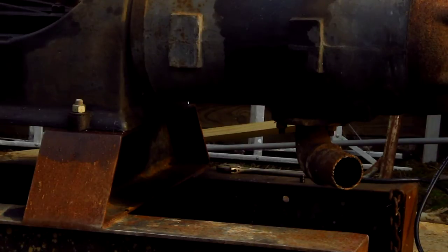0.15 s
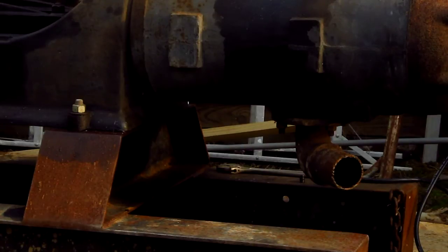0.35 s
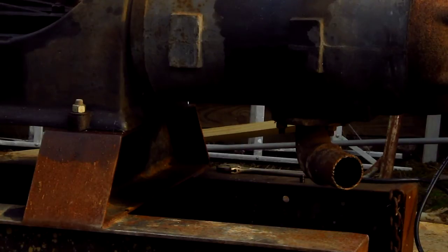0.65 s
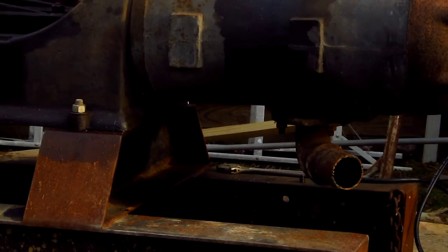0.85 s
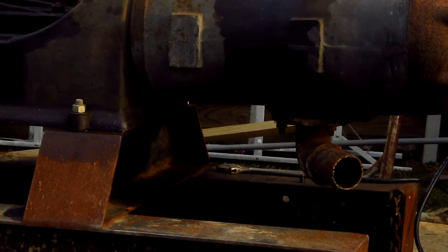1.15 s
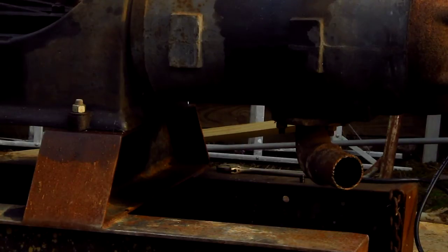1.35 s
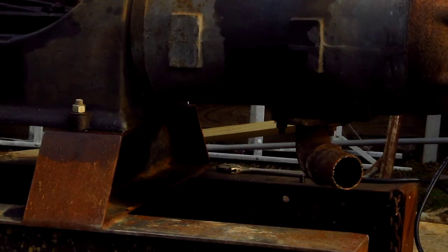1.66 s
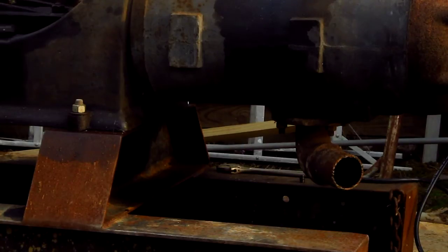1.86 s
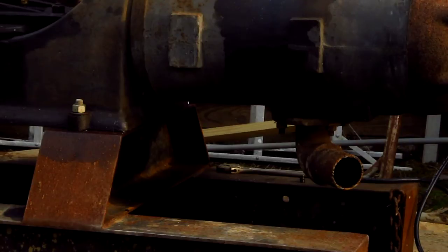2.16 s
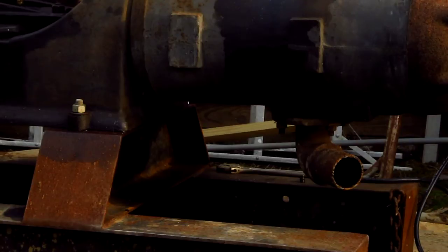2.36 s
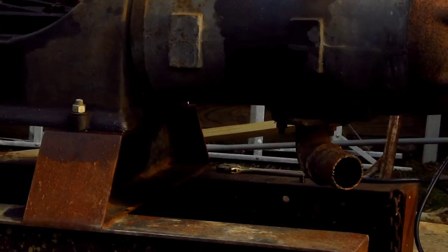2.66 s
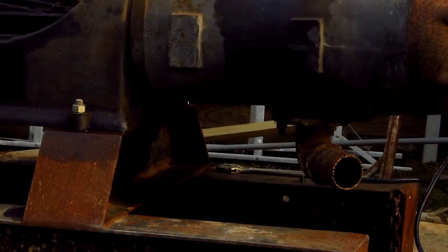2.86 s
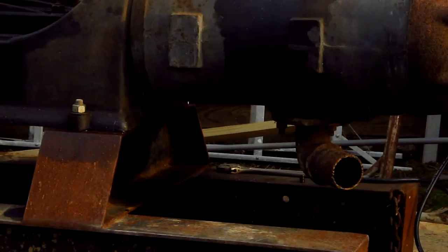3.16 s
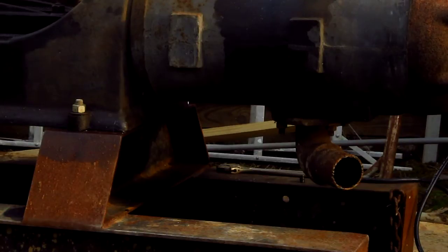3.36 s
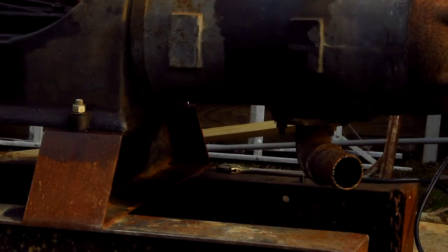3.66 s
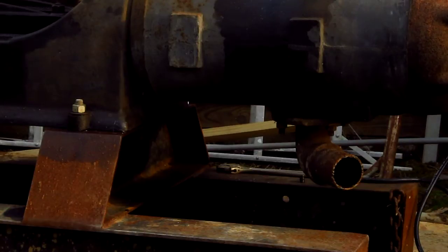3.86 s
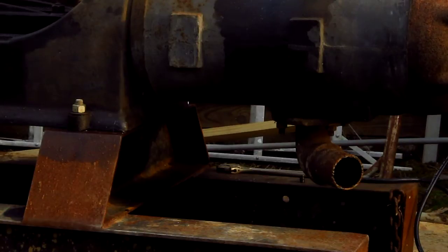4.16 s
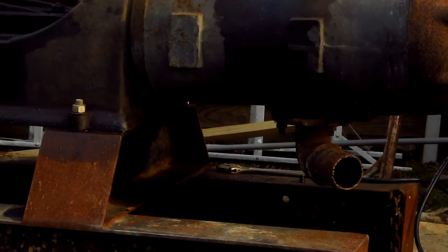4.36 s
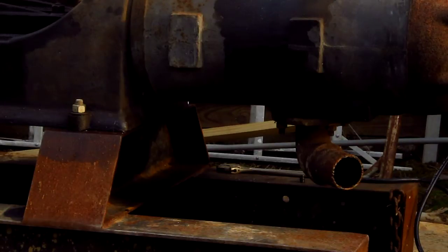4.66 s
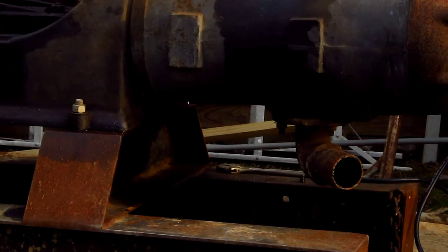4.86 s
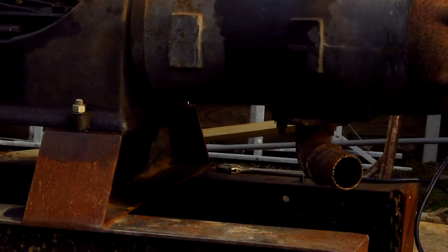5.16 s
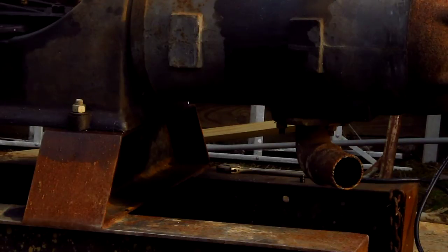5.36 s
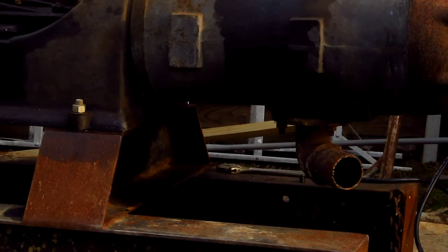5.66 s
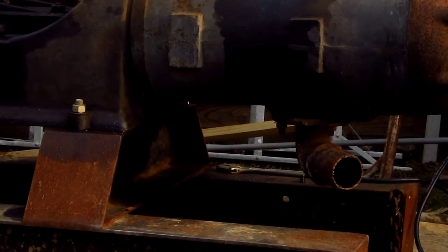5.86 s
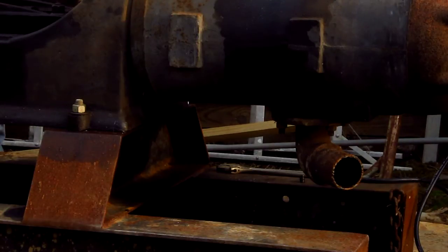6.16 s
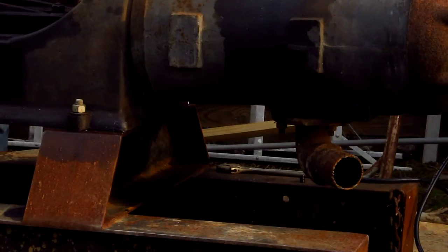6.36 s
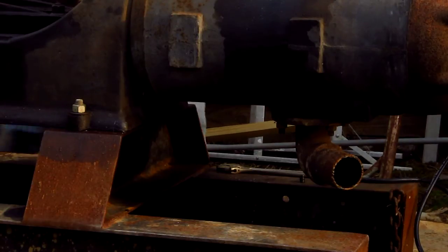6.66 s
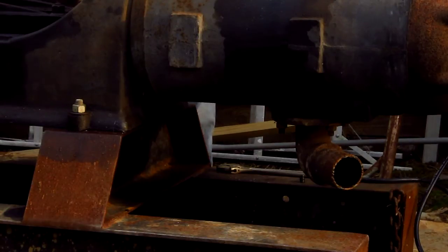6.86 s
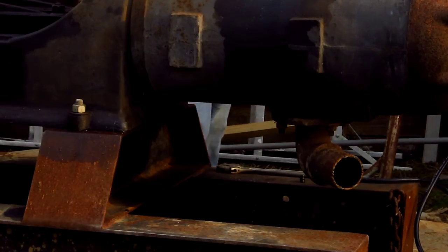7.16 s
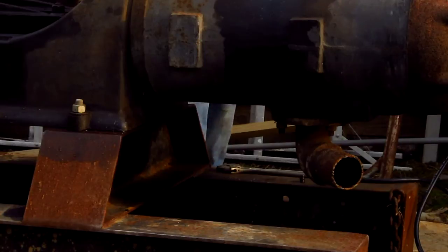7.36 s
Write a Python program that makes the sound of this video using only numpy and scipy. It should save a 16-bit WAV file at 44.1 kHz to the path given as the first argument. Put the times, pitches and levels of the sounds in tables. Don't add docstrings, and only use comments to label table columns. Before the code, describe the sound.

Close stereo pickup of a slow steam engine in a quiet open yard, with a faint, wavering low motor hum and rumble throughout. A loud bright steam jet is already blowing and fades by 0.45 s, leaving the hum. At 1.2 s a rod knocks dully; a softer singing, gurgling hiss swells on the right, strongest around 1.65, then sinks. At 2.0-2.2 a juddering, hollow chuff thuds and spits wetly, with a tiny high whistle. A low airy pipe song and spits lead into a long jet, full from 2.7, getting brighter and drier, cut at 3.9 by a quick clatter of ringing loose iron. Quiet hum. At 4.4 another knock and right-hand leak; at 5.25 a softer chuff. Faint metal taps and spits around 5.5-5.85 open the last strong jet, full from 6.0 to the end at 7.5. A soft double-bump footstep on boards lands at 6.56.

```python
import sys
import numpy as np
from scipy import signal
from scipy.fft import rfft, irfft, next_fast_len
from scipy.io import wavfile
from scipy.ndimage import uniform_filter1d

SR = 44100
rng = np.random.default_rng(int(sys.argv[2]) if len(sys.argv) > 2 else 0)


def gain_from_decibels(decibels):
    exponent = np.asarray(decibels, float) / 20
    return 10 ** exponent


def inscribe(sig):
    pcm = np.round(np.clip(np.atleast_2d(sig).T, -1, 1) * 32767)
    wavfile.write(sys.argv[1], SR, pcm.astype(np.int16))


N = 331632
SIZE = next_fast_len(N + SR // 8)
HZ = np.maximum(np.arange(SIZE // 2 + 1) * SR / SIZE, 1)

# (frequency [Hz], level [dB per Hz])
EXHAUST_TONE = [(180, -58), (300, -39), (674, -21.5), (863, -24.5), (1940, -13.5), (2930, -9.5),
                (3180, -11.5), (5300, -8.5), (7750, -13.5), (8840, -13), (12700, -16.5), (15500, -24.5)]


def rms_one(x):
    return x / np.sqrt(np.mean(x ** 2) + 1e-20)


def in_time(*tables):
    rows = []
    for table in tables:
        first, last = table[0], table[-1]
        rows += [(first[0] - .02, -100, *first[2:]), *table, (last[0] + .02, -100, *last[2:])]
    s, *columns = np.transpose(rows)
    return [np.interp(np.arange(N) / SR, s, column) for column in columns]


def at_hz(points):
    hz, value = np.transpose(points)
    return np.interp(np.log(HZ), np.log(np.maximum(hz, 1)), value)


def through(x, response):
    return irfft(rfft(x, SIZE) * response, SIZE)[..., :N]


def drift(rate):
    r = np.exp(-64 * np.pi * rate / SR)
    slow = signal.lfilter([1], [1, -2 * r, r * r], rng.standard_normal(N // 32 + 1002))[1000:]
    return np.interp(np.arange(N) / 32, np.arange(len(slow)), rms_one(slow))


def humps(rings):
    power = 0
    for hz, width, level_db in rings:
        power = power + gain_from_decibels(2 * level_db) / (1 + (2 * (HZ - hz) / width) ** 2 / 2.3) ** 2
    return power


def dips(notches):
    gain = np.ones_like(HZ)
    for hz, width, depth_db in notches:
        gain *= 1 - (1 - gain_from_decibels(min(depth_db, 0))) / (1 + ((HZ - hz) / width) ** 2)
    return gain


def ports(lean_db, lag_s):
    left = gain_from_decibels(lean_db * np.tanh(HZ / 1500)) * np.exp(-2j * np.pi * HZ * lag_s)
    return np.array([left, np.ones_like(HZ)])


def swells(rows, fall_s):
    t, levels = np.arange(N) / SR, []
    for start, end, db, rise_s in rows:
        outside = np.maximum((start - t) / rise_s, (t - end) / fall_s)
        levels.append(db - 20 * np.maximum(0, outside))
    return np.max(levels, axis=0)


def ironwork(colour, rings, between_db):
    power = gain_from_decibels(2 * (at_hz(colour) + between_db)) + humps(rings)
    cepstrum = irfft(np.log(power) / 2, SIZE)
    cepstrum[1:SIZE // 2] *= 2
    cepstrum[SIZE // 2 + 1:] = 0
    return np.exp(rfft(cepstrum))


def exhaust_pipe():
    # (frequency [Hz], width [Hz], level [dB])
    iron_rings = [(2510, 60, -13), (2960, 170, -9), (3490, 52, -7), (3690, 59, -6), (3870, 31, -9),
                  (4040, 57, -6), (4620, 68, -4), (4950, 37, -1), (5460, 220, 0), (5790, 110, -4),
                  (6030, 56, -3), (6360, 25, -6), (6740, 150, -3), (7060, 53, -3), (7390, 36, -9),
                  (7710, 34, -11), (8180, 110, -8), (8550, 120, -6), (8820, 130, -7), (9210, 69, -7),
                  (9880, 120, -8), (10300, 98, -10), (10700, 100, -12), (11600, 64, -11), (12000, 130, -14),
                  (12300, 120, -12), (12700, 130, -12), (13400, 140, -15),
                  (710, 78, -25.5), (1544, 110, -14), (5084, 320, -7)]
    # (frequency [Hz], width [Hz], depth [dB])
    echo_dips = [(4730, 59, -14), (5577, 77, -13), (6815, 34, -5.5)]
    return ironwork(EXHAUST_TONE, iron_rings, between_db=-1.5) * dips(echo_dips)


def follow(flows, slugs, laws, early):
    knee_soft_db, drain_shape = 2.5, 2.14
    gather_s = 0.22
    strokes = []
    for flow, slug in zip(flows, slugs):
        strongest_db, end_s = max(np.transpose(flow)[1]), flow[-1][0]
        strokes.append([(s, db, strongest_db, end_s, *slug) for s, db in flow])
    hiss_db, full_db, end, start, amount, stays, returns = in_time(*strokes)
    t = np.arange(N) / SR
    closing = returns * np.exp(-(np.maximum(end - t, 0) / gather_s) ** 2)
    age = t - start
    age = np.maximum(age, -early * age)
    levels = [hiss_db]
    for level_db, knee_db, slope, wet_db, drain_s in laws:
        below = (knee_db + full_db - hiss_db) / knee_soft_db
        drop_db = slope * knee_soft_db * np.logaddexp(0, below)
        wetness = closing + stays + (amount - stays) * np.exp(-(age / drain_s) ** drain_shape)
        levels.append(full_db + level_db - drop_db + wet_db * wetness)
    return levels


def jet(levels, path, smooth, ears, diffuse_db, gusty_db, echoes_db):
    splits_hz, echoes_t60_s = (1200, 3500, 8000), .022
    hiss_db, roar_db, body_db, top_db = levels
    gusts = gain_from_decibels(gusty_db * (drift(3.14) + drift(48) + 0.28 * drift(200)))
    rising = np.tanh(0.15 + HZ / 7000)
    echoes = rng.standard_normal(800) * gain_from_decibels(-60 * np.arange(800) / SR / echoes_t60_s)
    echoes[:SR // 1000] = 0
    echoes = echoes / np.sqrt(np.sum(echoes ** 2))
    echoes = rfft(echoes, SIZE) * [[1], [-1]]
    direct = rfft(gusts * rng.standard_normal(N), SIZE) * path * ears
    diffuse = rfft(gusts * rng.standard_normal((2, N)), SIZE) * gain_from_decibels(diffuse_db) * rising * smooth
    steam = direct * (1 + gain_from_decibels(echoes_db) * rising * echoes) + diffuse
    steps = [1 / (1 + (hz / HZ) ** 6) for hz in splits_hz]
    shares = [1 - steps[0], steps[0] - steps[1], steps[1] - steps[2], steps[2]]
    out = np.zeros((2, N))
    for db, share in zip([roar_db, body_db, hiss_db, top_db], shares):
        band = rms_one(irfft(steam * share, SIZE)[:, :N])
        out += gain_from_decibels(db + .5 * drift(35)) * band
    return out


def song(level_db, tones, ears, boost_db):
    air = through(rng.standard_normal(N), np.sqrt(humps(tones)) * ears)
    return gain_from_decibels(level_db + boost_db) * rms_one(air)


def strikes(events, modes, spread_db, soft_s):
    at, out = [round(e[0] * SR) for e in events], np.zeros(N)
    luck = spread_db * rng.standard_normal((len(at), len(modes)))
    sides = rng.choice([-1, 1], luck.shape)
    swell = np.exp(-1 / (soft_s * SR))
    for k, (hz, level_db, t60) in enumerate(modes):
        clicks = np.full(N, 1e-18)
        clicks[at] = gain_from_decibels(np.array(events)[:, 1] + level_db + luck[:, k]) * sides[:, k]
        r, w = gain_from_decibels(-60 / (t60 * SR)), 2 * np.pi * hz / SR
        ringing = [1, -2 * r * np.cos(w), r * r]
        rounding = [1, -2 * swell * np.cos(w), swell ** 2]
        gain = 2 * (1 - swell) * np.sin(w) ** 2
        out += signal.lfilter([0, gain], np.convolve(ringing, rounding), clicks)
    return signal.sosfilt(signal.butter(2, 0.63 * modes[0][0], "high", fs=SR, output="sos"), out)


def yard():
    # (frequency [Hz], level [dB per Hz])
    yard_tone = [(71, -38), (120, -15), (234, -18.5), (323, -21.5), (420, -50), (446, -12.5), (474, -19),
                 (524, -16.5), (5140, -21.5), (5570, -19.5), (7860, -31.5), (13300, -29.5), (13800, -39),
                 (15500, -42)]
    # (frequency [Hz], likeness [0 to 1])
    likeness = [(60, 0.92), (240, 1), (950, 0.25), (3770, 0.05), (15000, 0.03)]
    alike = np.clip(at_hz(likeness), -1, 1)
    mid, side = rfft(rng.standard_normal((2, N)), SIZE) * [np.sqrt(1 + alike), np.sqrt(1 - alike)]
    floor = irfft(gain_from_decibels(at_hz(yard_tone)) * (mid + side * [[1], [-1]]), SIZE)[:, :N]
    return gain_from_decibels(-55.5) * rms_one(floor)


def motor():
    # (time [s], frequency [Hz], level [dB])
    hum = [(0.12, 102, -71), (0.45, 96.3, -61), (0.71, 101.7, -60), (1.32, 101.7, -60), (1.55, 100.5, -57),
           (2.11, 101.7, -54), (2.3, 98.9, -56), (2.72, 97.6, -54.5), (2.95, 96.3, -69), (3.65, 96.4, -74),
           (3.9, 93.1, -68), (4.28, 94.0, -57), (4.55, 95.2, -59), (4.82, 101.6, -60), (5.57, 101.6, -55),
           (6.0, 101.6, -54), (6.45, 101.5, -63), (7.52, 102, -66)]
    # (frequency [Hz], level [dB per Hz])
    rumble_tone = [(12, -45), (20, -4), (97, -4.5), (156, -11), (189, -10.5), (242, -14), (400, -10.5),
                   (520, -42), (880, -120)]
    # (start [s], end [s], level [dB], rise [s per 20 dB])
    shudders = [
        (1.36, 1.44, -50, .3),
        (2.06, 2.16, -45, .2),
        (4.42, 4.52, -55, .2),
        (5.26, 5.34, -48, .2),
        (5.85, 5.98, -50, .3),
        (6.75, 7.52, -57, .6),
    ]
    # (time [s], change [dB])
    stumbles = [
        (1.43, -13.5),
        (4.42, -18),
        (5.26, -7),
        (7.2, -8),
    ]
    s, *columns = np.transpose(hum)
    t = np.arange(N) / SR
    hz, line_db = [np.interp(t, s, column) for column in columns]
    rumble_db = -57 + .8 * (line_db + 60)
    rumble_db = np.maximum(rumble_db, swells(shudders, fall_s=.25))
    for at, db in stumbles:
        line_db = line_db + db * np.exp(-((t - at) / 0.054) ** 2)
    turn = np.pi * np.cumsum(hz + 1.41 * drift(6.7)) / SR
    orders = gain_from_decibels(1.5 + 2.1 * drift(12)) * np.sin(2 * turn)
    orders += gain_from_decibels(-11 + 3 * drift(5)) * np.sin(turn)
    near, own = rng.standard_normal(N), rng.standard_normal((2, N))
    rumble = near + 0.9 * own * np.array([[.6], [1.2]])
    rumble = rms_one(through(rumble, gain_from_decibels(at_hz(rumble_tone))))
    return gain_from_decibels(line_db) * orders + gain_from_decibels(rumble_db - 2.0) * rumble


def footfall():
    # (time [s], peak [dB])
    bumps = [
        (6.558, -36.5),
        (6.575, -38.5),
        (6.585, -43),
        (6.612, -45.5),
    ]
    # (frequency [Hz], level [dB], time to fall 60 dB [s])
    boards = [(131, -1, 0.066), (197, 3, 0.068), (287, -3, 0.03)]
    return strikes(bumps, boards, 2.7, 0.00185)


def valve_gear():
    # (time [s], peak [dB])
    thuds = [
        (2.03, -45.5),
        (2.07, -45.5),
        (5.235, -47),
        (5.28, -45.5),
    ]
    knocks = [
        (1.185, -40.5),
        (4.39, -42),
    ]
    clanks = [(3.8447, -40), (3.8651, -36), (3.8805, -36), (3.8879, -33), (3.8984, -31), (3.9074, -32),
              (3.9121, -34), (3.9195, -37), (3.9374, -37), (3.9599, -40), (3.985, -44)]
    cover_blows = [
        (3.884, -42),
        (3.905, -46),
        (5.3, -47),
    ]
    bracket_blows = [
        (3.929, -43),
        (5.47, -60),
        (5.628, -50),
    ]
    # (frequency [Hz], level [dB], time to fall 60 dB [s])
    frame = [(71.6, 2, 0.56), (135, 2, 0.35), (224, 0.5, 0.42), (296.7, -2.5, 0.78), (358.6, 4, 0.37),
             (653, 2, 0.13)]
    rod = [(194, -2.5, 1), (624, -7, 0.43)]
    plate = [(1357, -22, .5), (1464, -24, .6), (1560, -14, .12), (1717, -20, .3), (1793, -19, .35),
             (1850, -17, .2), (1938, -15, .4), (2083, -8, .27), (2140, -16, .2), (2310, -18, .25),
             (2433, -5, .25), (2500, -10, .2), (2590, -6, .22), (2640, -7, .2), (2681, -9, .3),
             (2760, -13, .25), (2837, -12, .25), (3025, -19, .3), (3165, -24, .28)]
    cover = [(371, -12, 0.27), (580, -14, .2), (690, -5, 0.186), (760, -12, .2), (1000, -6, .25),
             (1130, -18, .4)]
    bracket = [(511, 0, .55), (1066, 2.5, .36)]
    iron = strikes(thuds, frame, 1.1, 0.0023) + strikes(knocks, rod, 1.1, 0.0033)
    iron += strikes(clanks, plate, 4.2, 0.0024)
    return iron + strikes(cover_blows, cover, 1.5, .004) + strikes(bracket_blows, bracket, .6, .004)


def whistles():
    # (start [s], end [s], frequency [Hz], level [dB])
    whistle_rows = [
        (2.08, 2.156, 9234, -41),
        (5.267, 5.325, 9200, -42),
    ]
    t, out = np.arange(N) / SR, np.zeros(N)
    for start, end, hz, level_db in whistle_rows:
        gate = np.clip(np.minimum(t - start, end - t) / 0.0054, 0, 1)
        tone = np.sin(2 * np.pi * np.cumsum(hz + 40 * drift(50)) / SR)
        out += gate * gain_from_decibels(level_db + 2.5 + 2.5 * drift(60)) * tone
    return out


def spits():
    # (time [s], peak [dB], time to fall 60 dB [s])
    spit_rows = [(1.963, -12, 0.05), (2.0, -14, 0.04), (2.034, -14, 0.09), (2.1036, -16.5, 0.07),
                 (2.158, -7.5, 0.024), (2.1928, -12, 0.039), (2.4714, -27, 0.05), (2.4932, -16, 0.041),
                 (2.5239, -25, 0.014), (5.1794, -24, 0.08), (5.73, -20, 0.046), (5.8193, -12.5, 0.044),
                 (5.844, -19, 0.029)]
    t, shape = np.arange(N) / SR, np.zeros(N)
    for s, peak_db, t60 in spit_rows:
        age = np.maximum(t - s, 0)
        shape += gain_from_decibels(peak_db - 6.5 - 60 * age / t60) * np.tanh(age / .0016)
    thump = gain_from_decibels(-4.0) / (1 + 2j * (HZ - 630) / 90)
    wet = exhaust_pipe() / (1 + HZ / 9000) + thump
    return through(shape * rng.standard_normal(N), wet / np.sqrt(np.mean(np.abs(wet) ** 2)))


def chuff_shape():
    # (time [s], level [dB], length [s])
    closings = [
        (2.03, -23, 0.085),
        (5.233, -26, 0.07),
    ]
    t = np.arange(N) / SR
    nearest = np.argmin([np.abs(t - c[0]) for c in closings], axis=0)
    s, peak_db, length = np.array(closings)[nearest].T
    age = np.maximum(t - s, 0)
    sag_db = -100 * age - 150 * np.maximum(age - length, 0)
    fall_db = np.maximum(sag_db, -21 - 90 * age)
    return peak_db + fall_db - 900 * np.maximum(s - t, 0)


def chuffs():
    # (time [s], peak [dB], cavity frequency [Hz])
    puff_rows = [(2.0198, -27, 2100), (2.0269, -22, 2450), (2.0375, -21, 1850), (2.0466, -20, 1810),
                 (2.0547, -18, 1750), (2.0683, -21, 1660), (2.0725, -22, 1730), (2.0869, -23, 2060),
                 (2.101, -24, 2200), (2.1051, -27, 2140), (2.1145, -29, 1700), (2.1278, -31, 1890),
                 (2.1321, -32, 2190), (2.147, -37, 1530), (5.2245, -36, 2220), (5.2315, -25, 2510),
                 (5.238, -22, 2270), (5.2446, -25, 1810), (5.2488, -23, 1790), (5.2595, -22, 1710),
                 (5.2636, -27, 1400), (5.2684, -28, 2270), (5.273, -24, 1660), (5.2774, -25, 1790),
                 (5.2915, -28, 1770), (5.3002, -31, 1940), (5.3057, -27, 2090), (5.3193, -28, 2120),
                 (5.3267, -33, 1930), (5.3321, -34, 1670), (5.3366, -35, 1910), (5.3424, -35, 1920),
                 (5.3561, -39, 2050), (5.3608, -39, 1610), (5.3649, -39, 1720), (5.3783, -43, 2430)]
    # (start [s], end [s], level [dB], rise [s per 20 dB])
    booms = [
        (2.035, 2.05, -36, .02),
        (2.075, 2.15, -36.5, .05),
        (5.24, 5.26, -40, .02),
        (5.3, 5.36, -41, .08),
    ]
    s, peak_db, cavity_hz = np.transpose(puff_rows)
    centre_hz = np.interp(np.arange(N) / SR, s, cavity_hz)
    steam, cavity, low = rng.standard_normal(N), np.zeros(N), np.zeros(N)
    for hz in np.geomspace(400, 3600, 11):
        sos = signal.butter(2, [hz / 1.12, hz * 1.12], "band", fs=SR, output="sos")
        band = rms_one(signal.sosfilt(sos, steam))
        cavity += band * np.exp(-(np.log(1.06 * hz / centre_hz) / 0.3) ** 2)
        low += band * np.exp(-(np.log(hz / 620) / 0.3) ** 2)
    cavity /= np.sqrt(uniform_filter1d(cavity ** 2, size=120) + .01)
    puffs, around = np.zeros(N), np.arange(-441, 1323)
    age = around / SR
    shape_db = -3.5 - 20 * np.maximum(-age / .003, age / .007)
    for at, db in zip(s, peak_db):
        puffs[round(at * SR) + around] += gain_from_decibels(db + shape_db)
    bed = gain_from_decibels(chuff_shape() - 11)
    boom = gain_from_decibels(swells(booms, fall_s=.06) + 1.2 * drift(40))
    return (puffs + bed) * cavity + boom * low


def gland_leak():
    # (time [s], level [dB])
    leak_flow = [
        [(1.05, -63.5), (1.156, -42), (1.33, -31.5), (1.64, -24), (1.822, -26), (1.95, -33), (2.08, -37.5),
         (2.22, -39), (2.33, -53)],
        [(4.3, -61), (4.368, -41), (4.512, -32.5), (4.66, -27), (4.924, -27.5), (5.17, -38), (5.34, -40),
         (5.47, -47), (5.6, -58)],
    ]
    # (time [s], amount, amount that stays, amount back at closing)
    leak_water = [
        (2.13, 1.2, .02, -1.1),
        (5.29, 1.1, .02, -.9),
    ]
    # (level [dB re full hiss], knee [dB re full flow], slope [dB per dB], wet gain [dB], drain [s])
    leak_laws = [
        (-15, 1.5, 0.84, 8.8, 0.16),
        (-4.5, -1, 1.11, 6.2, 0.044),
        (0.5, 1.5, 1.43, 1.5, 0.055),
    ]
    # (frequency [Hz], level [dB per Hz])
    leak_tone = [(180, -52.5), (300, -25.5), (581, -2.5), (769, -8), (907, -6.5), (1350, -7), (2100, -3.5),
                 (2520, -6.5), (5480, -4), (12900, -7), (14600, -11), (15300, -28)]
    # (frequency [Hz], width [Hz], level [dB])
    leak_rings = [(663, 280, -7.5), (915, 44, -4), (2141, 52, 3.5), (2946, 157, -4.5), (4450, 79, -5),
                  (5050, 70, -1), (5490, 340, -2.5), (6260, 170, -20), (6920, 390, -1), (7660, 54, -2),
                  (8240, 120, -7), (8780, 120, -19), (9190, 150, 4), (10250, 100, -26.5), (10930, 27, -27),
                  (11550, 130, -28), (11800, 90, -1.5), (12500, 90, -4), (12800, 60, -5), (13100, 67, -19),
                  (13800, 130, -7), (14250, 200, -7)]
    # (frequency [Hz], width [Hz], depth [dB])
    leak_dips = [(4700, 90, -8), (6850, 150, -4), (8550, 90, -5), (9700, 250, -4), (13420, 70, -10),
                 (14020, 50, -8)]
    # (start [s], end [s], level [dB], rise [s per 20 dB])
    gland_singing = [
        (1.13, 1.4, -43, .03),
        (1.66, 2.02, -36, .25),
        (4.35, 4.65, -44, .03),
        (4.95, 5.21, -39, 0.5),
    ]
    gurgle = [
        (1.5, 1.98, -45, .3),
    ]
    # (frequency [Hz], width [Hz], level [dB])
    gland_tones = [(650, 175, -7), (960, 38, -16), (2073, 45, 11), (2900, 53, 1), (9160, 90, -12.5),
                   (11800, 60, -15)]
    gurgle_tone = [(915, 60, 0)]
    gap_tones = [(9190, 90, 0), (11800, 60, -7), (5050, 60, -8)]
    right = ports(lean_db=-3.6, lag_s=26e-6)
    gland = ironwork(leak_tone, leak_rings, between_db=-1.0) * dips(leak_dips)
    leaking = follow(leak_flow, leak_water, leak_laws, early=0.96)
    hiss_db = leaking[0]
    hiss = jet(leaking, gland, gain_from_decibels(at_hz(leak_tone)), right, diffuse_db=-4, gusty_db=.5, echoes_db=-9.5)
    singing = np.minimum(swells(gland_singing, fall_s=.06), hiss_db + 3)
    songs = song(singing, gland_tones, right, boost_db=-5.0)
    songs += song(swells(gurgle, fall_s=.1), gurgle_tone, right, boost_db=0)
    songs += song(hiss_db, gap_tones, right, boost_db=-14)
    return hiss + songs


def exhaust():
    # (time [s], level [dB])
    exhaust_flow = [
        [(0.0, -19.5), (0.176, -18.5), (0.326, -27.5), (0.404, -37), (0.464, -54.5), (0.59, -80)],
        [(2.22, -58), (2.34, -50), (2.45, -40), (2.53, -28), (2.68, -17.5), (3.78, -20), (3.882, -23.5),
         (3.982, -51), (4.08, -70)],
        [(5.46, -64), (5.57, -57), (5.77, -36), (5.82, -28.5), (6.03, -17.5), (6.82, -18.5), (7.5, -19.5),
         (7.52, -22.5)],
    ]
    # (time it starts to drain [s], amount, amount that stays, amount back at closing)
    exhaust_water = [
        (-0.7, 1.0, .15, 1.3),
        (2.66, 1.06, 0.017, .6),
        (5.93, .98, .32, .35),
    ]
    # (level [dB re full hiss], knee [dB re full flow], slope [dB per dB], wet gain [dB], drain [s])
    exhaust_laws = [
        (-32, -9, .5, 10.5, .2),
        (-15.5, -2.5, 1.02, 11.5, .24),
        (-3.2, -1.5, 0.97, -7, 0.36),
    ]
    song_law = (-35.5, -15, .6, 24, .24)
    # (time [s], change [dB], width [s])
    song_breaks = [(2.232, -14, .02), (2.3, -9, .025), (2.355, -5, .01), (2.42, 3, .03), (2.48, -8, .025),
                   (5.43, -18, .05), (5.53, 4, .03), (5.63, 3, .04), (5.69, -4, .02)]
    # (frequency [Hz], width [Hz], level [dB])
    pipe_tones = [(710, 60, 1.5), (1554, 200, 5.5), (2080, 75, 9), (3700, 110, -2), (5500, 300, -1),
                  (7070, 450, -1)]
    ahead = ports(lean_db=-2.3, lag_s=2e-6)
    blowing = follow(exhaust_flow, exhaust_water, exhaust_laws, early=0)
    smooth = gain_from_decibels(at_hz(EXHAUST_TONE))
    blast = jet(blowing, exhaust_pipe(), smooth, ahead, diffuse_db=-9, gusty_db=0.41, echoes_db=-8.5)
    song_water = np.multiply(exhaust_water, [1, 1, 1, .3])
    singing = follow(exhaust_flow, song_water, [song_law], early=0)[1]
    for at, db, width in song_breaks:
        singing += db * np.exp(-((np.arange(N) / SR - at) / width) ** 2)
    return blast + song(singing, pipe_tones, ahead, boost_db=-4.0)


def scene():
    far = (yard() + motor()) * gain_from_decibels(np.array([[-.6], [.6]]))
    close = footfall() + valve_gear() + whistles() + spits() + chuffs()
    return far + close * gain_from_decibels(np.array([[-.7], [.7]])) + gland_leak() + exhaust()


def top_cut(x):
    return signal.sosfilt(signal.butter(12, 15770, fs=SR, output="sos"), x)


def record(dry):
    # (frequency [Hz], width [Hz], depth [dB])
    housing = [(7800, 35, -16)]
    heard = through(dry, dips(housing) / np.sqrt(1 + (HZ / 15300) ** 12))
    return top_cut(heard)


dry = scene()
out = record(dry)
inscribe(out)
```